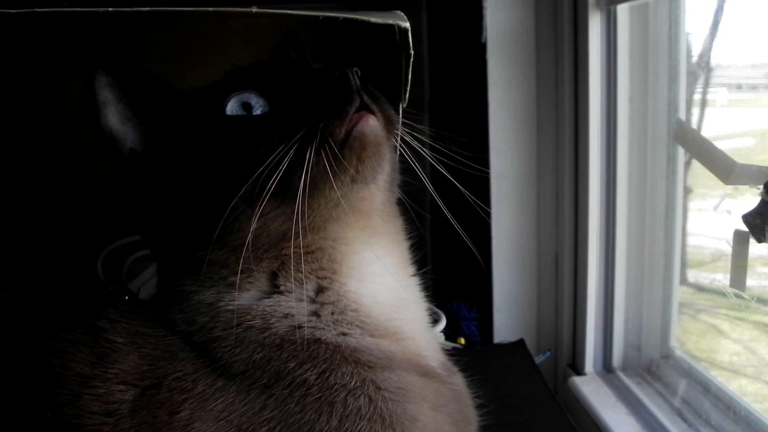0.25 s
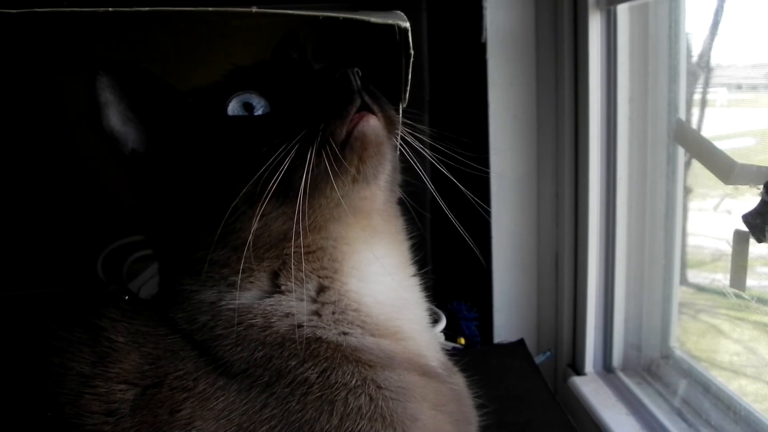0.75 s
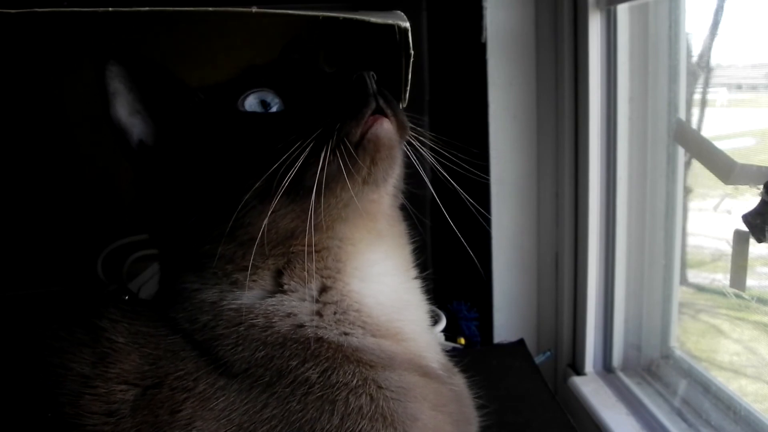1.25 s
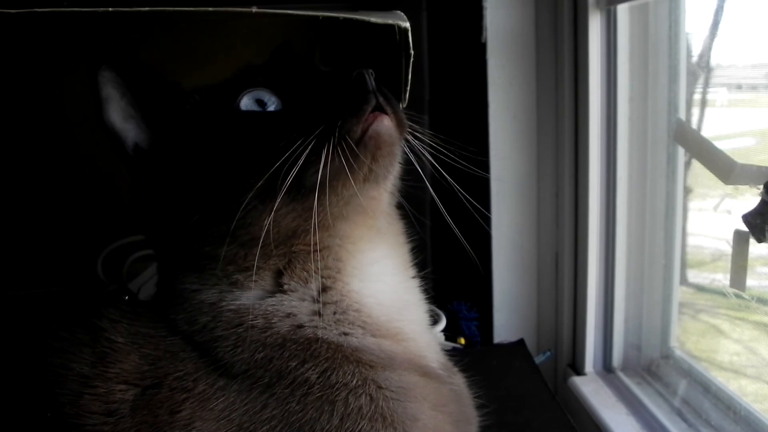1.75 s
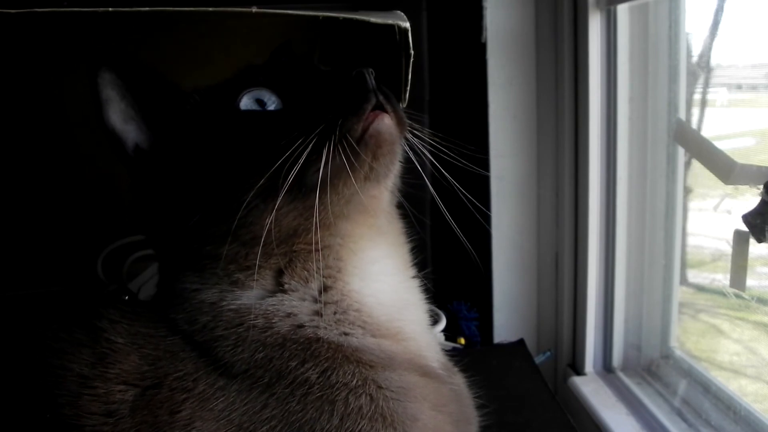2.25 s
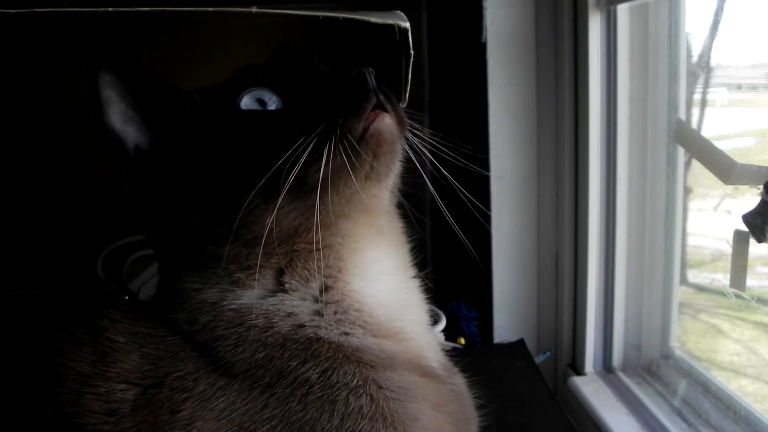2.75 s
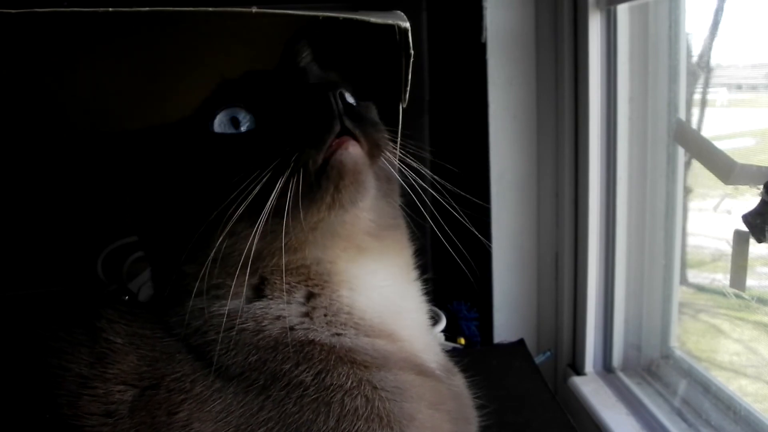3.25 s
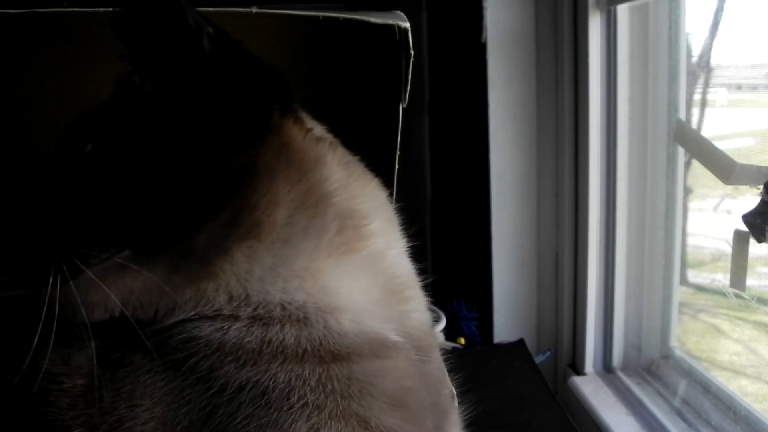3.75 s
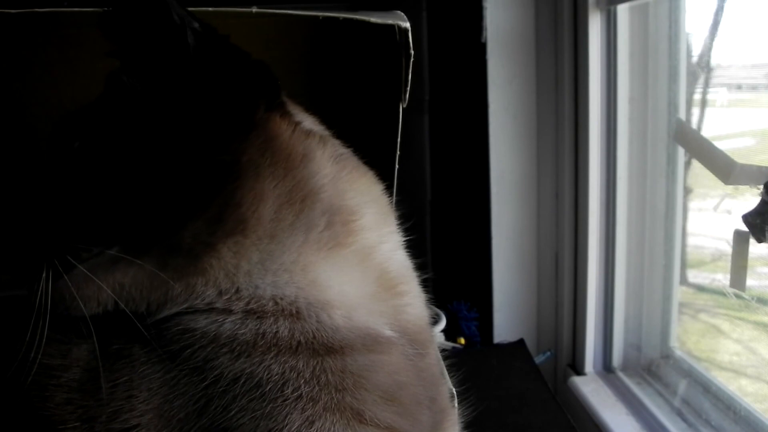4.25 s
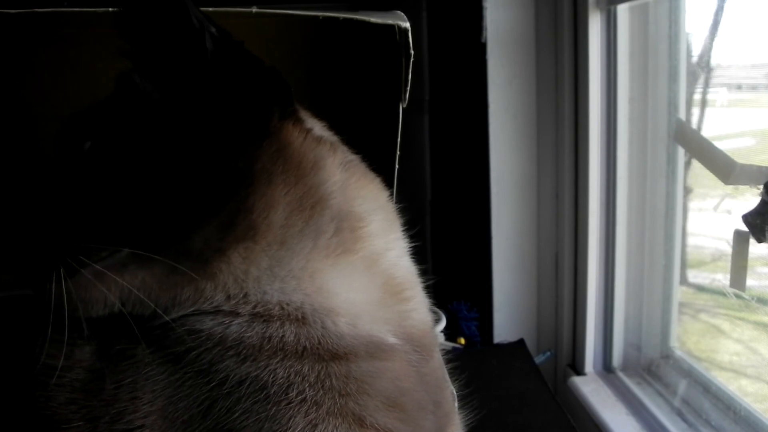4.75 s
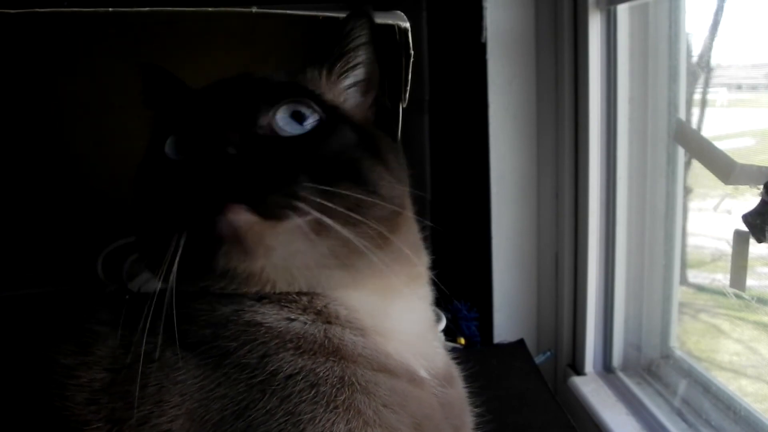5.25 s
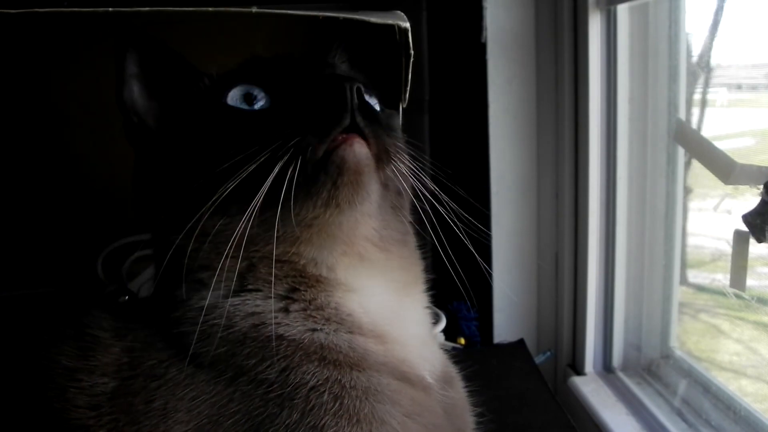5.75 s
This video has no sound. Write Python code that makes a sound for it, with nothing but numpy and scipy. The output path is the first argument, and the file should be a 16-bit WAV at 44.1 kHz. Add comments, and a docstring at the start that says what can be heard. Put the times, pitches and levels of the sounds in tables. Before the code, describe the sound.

A low indoor rumble, a wavering hum and a soft hiss run for the whole six seconds in a small room. From about 0.1 to 1 second, a cat close to the microphone chatters: around nine quick, uneven jaw clicks, dry and voiceless, each a snap with a slight wet crackle and a short room echo. Outside the closed window, distant birds sound faintly, softened by their echo. A falling whistle comes at about 1.1 seconds, small peeps and thin high calls between 1.8 and 3 seconds, and another falling whistle at 3.3. The cat clicks again from about 3.5 to 4.5 seconds, with a tight cluster near 3.7 and another near 4.4. A last faint falling whistle comes at about 5.1 seconds, then only the room tone remains.

```python
"""A cat chatters at birds from behind a closed window: two close bursts of dry, voiceless jaw clicks.
Each click is a snap and a wet crackle that ring the mouth for a few milliseconds; the window recess
and a small room answer it. Outside, birds whistle and peep faintly: gliding tones, heard mostly as
their echo in the yard. Under it all lie a low indoor rumble, a wavering hum and a soft hiss."""
import sys
import numpy as np
from scipy import signal
from scipy.fft import rfft, irfft, next_fast_len
from scipy.io import wavfile
from scipy.ndimage import map_coordinates

SR = 44100
rng = np.random.default_rng(int(sys.argv[2]) if len(sys.argv) > 2 else 0)


def wrap_up_sound(samples):
    """Save the sound to the file named by the first command line argument, as 16-bit audio."""
    columns = np.atleast_2d(samples).T
    # keep every value between -1 and 1, then stretch to whole-number steps
    tamed = np.clip(columns, -1, 1)
    steps = np.round(tamed * 32767).astype(np.int16)
    wavfile.write(sys.argv[1], SR, steps)


N = 265041


# jaw clicks: t/s, relative level/dB, EQ for hollow lows/dB, hard mids/dB, brightness/dB, sharp top/dB,
# then wet crackle over the snap/dB
JAW_CLICKS = [(0.1425, -16, 4, 3, 0, -4, -7.5), (0.2619, -23, 1.5, -3.5, -0.5, -8, -23),
              (0.3927, -22.5, 3, -3.5, 1.5, -5.5, -17), (0.4589, -19.5, 4, 1.5, -0.5, -5, -6.5),
              (.598, -33.5, 5.5, 3, 2, -1, 5), (0.6517, -16, 1.5, -1, 0, -3.5, -10),
              (.752, -19.5, 4.5, 1, -0.5, -1, -4), (0.8242, -18.5, 1.5, 0, 2, -5.5, -11),
              (0.9649, -39, 7.5, 0.5, 5, 3.5, -1), (3.4531, -27, 5, 1, 0, 0.5, -4),
              (3.6452, -26, 6.5, 0.5, 3, 2, -10), (3.7043, -19.5, 4, -2, 1, 0.5, -15),
              (3.771, -16.5, 4, 2, 1, -0.5, -3.5), (3.8299, -17, 3.5, -1.5, -3, -1.5, -12),
              (4.119, -34.5, 5, -4, -4, -2, -1), (4.1277, -27.5, 4, -2, 1.5, -9, -2),
              (4.3723, -31, 3, -1, 0.5, -27, -2), (4.4265, -24.5, 0.5, 0, 5, -1, -2),
              (4.477, -19, 3.5, 3.5, 1.5, 2, -8)]
def chatter(level_db=3.5):
    """Each smack of the jaw rings the mouth; recess and room answer, and each click gets its own EQ."""
    out, t = np.zeros((2, N)), np.arange(SR // 2) / SR
    burst_gain = np.sqrt(2 * len(t) / (.0016 * SR))  # refers the level to a burst of 1.6 ms
    for s, db, low, middle, bright, top, crackle_db in JAW_CLICKS:
        click = close_click(t, crackle_db) + room_answer(t)
        eq = [(1300, low), (1700, 0), (2100, 0), (2500, middle), (2900, middle),
              (4000, bright), (6200, bright), (7400, top)]
        click = filtered(click, lambda hz: causal(amp(along(eq, hz))))
        add(out, amp(db + level_db) * click / burst_gain, s)
    return out


def close_click(t, crackle_db, pitch_spread=.022, strength_spread_db=1.2, sway_ms=.016):
    """One smack through mouth and early echoes; jaw shape and head position vary from click to click."""
    shifts = 1 + pitch_spread * rng.standard_normal(len(MOUTH_FORMANTS))
    strengths_db = strength_spread_db * rng.standard_normal(len(MOUTH_FORMANTS))
    slips_ms = sway_ms * rng.standard_normal(len(ECHO_PATHS))
    response = lambda hz: early_echoes(hz, slips_ms) * mouth(hz, shifts, strengths_db)
    return unit(filtered(smack(t, crackle_db), response))


def smack(t, crackle_db):
    """One snap, then a brief crackle as tongue and lips part; wetter smacks last longer."""
    decay_s = .0013 * amp(crackle_db)
    crackle = rng.standard_normal(len(t)) * t * np.exp(-t / decay_s)
    return signal.unit_impulse(len(t)) + amp(crackle_db) * crackle / np.linalg.norm(crackle)


# resonances of the mouth: f/Hz, width/Hz, relative level/dB
MOUTH_FORMANTS = [(646, 600, 15.5), (1234, 330, 18.5), (2027, 197, 19), (2543, 315, 19), (4400, 2700, 8.5),
                  (5936, 310, 11.5), (7680, 620, 8), (10010, 710, 2.5)]
def mouth(hz, shifts, strengths_db):
    """Steep-sided resonances, shifted and weighted by the shape of the jaw, and one notch."""
    peaks = [amp(db + strength) * ring(hz, f * shift, width) ** 2
             for (f, width, db), shift, strength in zip(MOUTH_FORMANTS, shifts, strengths_db)]
    notch = np.abs(1 - ring(hz, centre_hz=3500, width_hz=300))
    return causal(np.linalg.norm(peaks, axis=0) * notch)


# direct path, window recess and far wall: delay/ms, left level/dB, right level/dB
ECHO_PATHS = [(0, -.5, 2), (.55, -9.5, -4), (.93, -3, 2.5), (1.28, -11, -9), (2.19, -7, -6),
              (2.64, -4.5, -1), (3.66, -12, -6.5), (18.9, -10.5, -8.5), (20, -13, -11)]
def early_echoes(hz, slips_ms):
    """The direct sound and its distinct reflections; the left channel lags in the low mids."""
    echoes = sum(amp([[left], [right]]) * np.exp(-2j * np.pi * hz * (ms + slip) / 1000)
                 for (ms, left, right), slip in zip(ECHO_PATHS, slips_ms))
    left_allpass = 1 - 2 * ring(hz, centre_hz=635, width_hz=1875)
    return echoes * np.array([left_allpass, np.ones_like(hz)])


# reverb time of the small room: f/Hz, T60/s
ROOM_DECAY = [(300, 0.18), (2000, 0.28), (6000, 0.23), (10000, 0.16)]
# colour of a click as the furnishings return it: f/Hz, relative level/dB
ROOM_EQ = [(150, -23), (300, -13), (520, -3), (900, -1), (1300, -3.5), (1600, -3.5), (2100, 0),
           (2500, -0.5), (3200, -2.5), (3600, -13), (4100, -6.5), (6000, -4.5), (7000, -12.5), (7800, -5),
           (8700, -8.5), (10500, -20.5)]
def room_answer(t, scatter_db=-5.5, scatter_t60_s=.17, tail_db=-2):
    """Frame, sill and clutter scatter a short dense burst, and the room adds its tail."""
    def returned(x):
        predelayed = np.pad(x, ((0, 0), (SR // 300, 0)))[:, :len(t)]
        return unit(filtered(predelayed, lambda hz: amp(along(ROOM_EQ, hz))))
    scatter = returned(diffuse(len(t)) * amp(-60 * t / scatter_t60_s))
    tail = returned(reverb_tail(ROOM_DECAY))
    return amp(scatter_db) * scatter + amp(tail_db) * tail


# reverb time of the yard: f/Hz, T60/s
YARD_DECAY = [(2500, .2), (4500, .29), (8000, .09)]
def birds(direct_db=-10):
    """Distant birds, heard through the glass and mostly by way of their echoes."""
    kinds = [(falling_whistle, WHISTLE_CUES), (arch, ARCH_CUES),
             (thin_call, THIN_CUES), (peep, PEEP_CUES)]
    song = sum(call(*cue) for call, cues in kinds for cue in cues)
    echoes = signal.fftconvolve(song[None], reverb_tail(YARD_DECAY), axes=1)[:, :N]
    return amp(direct_db) * song + echoes


# falling whistles: crest t/s, crest f/Hz, lead-in/s, fall/s, opening level/dB, peak level/dB
WHISTLE_CUES = [(1.124, 5350, .02, .124, -57.5, -49.5), (3.286, 4850, .024, .11, -52.5, -48.5),
                (5.148, 5300, .02, .132, -57.5, -49)]
def falling_whistle(crest, crest_hz, lead, fall, opening_db, peak_db, rise_oct_per_s=20, end_hz=2200):
    """The pitch rises to a rounded crest and slides down; the tone swells, then fades at the bottom."""
    since_crest = lambda u: u * (lead + fall) - lead
    fallen = lambda u: np.maximum(since_crest(u), 0) / fall
    rise = lambda u: 2 ** (rise_oct_per_s * np.minimum(since_crest(u), 0))
    hz = lambda u: crest_hz * rise(u) * (end_hz / crest_hz) ** (fallen(u) ** 1.05)
    db = lambda u: np.interp(fallen(u), [0, .72, 1], [opening_db, peak_db, peak_db - 5])
    return bird_tone(crest - lead, lead + fall, hz, db, rasp=.048)


# lower arched notes that join two of the whistles: top t/s, top level/dB
ARCH_CUES = [(1.165, -55.5), (5.196, -53)]
def arch(top, top_db, length_s=.058, top_hz=4070, drop_hz=650, fade_db=7):
    """A brief note whose pitch and level rise and fall together."""
    droop = lambda u: (2 * u - 1) ** 2
    hz = lambda u: top_hz - drop_hz * droop(u)
    db = lambda u: top_db - fade_db * droop(u)
    return bird_tone(top - length_s / 2, length_s, hz, db, rasp=.03)


# thin high calls: t/s, slur level/dB, sweep delay/s, sweep level/dB
THIN_CUES = [(1.853, -61, .105, -68), (2.835, -64.5, .075, -67)]
def thin_call(s, slur_db, sweep_after, sweep_db, slur_s=.035, sweep_s=.125, rasp=.013):
    """A fading downward slur, a short rest, then a growing upward sweep."""
    glide_hz = lambda first, last: lambda u: first * (last / first) ** u
    slur = bird_tone(s, slur_s, glide_hz(8050, 7600), lambda u: slur_db - 2.5 * u, rasp)
    sweep = bird_tone(s + sweep_after, sweep_s, glide_hz(5250, 8600),
                      lambda u: sweep_db - 2 * (1 - u), rasp)
    return slur + sweep


# faint peeps of farther birds: t/s, f/Hz, level/dB
PEEP_CUES = [(1.08, 4550, -58), (1.81, 2750, -64), (1.875, 2880, -60), (2.38, 2600, -61),
             (2.699, 2940, -61), (2.76, 3100, -62)]
def peep(s, hz, db, length_s=.055, sag=.24):
    """A short note that sags in pitch."""
    return bird_tone(s, length_s, lambda u: hz * (1 - sag * (u - .5)), lambda u: db, rasp=.03)


def bird_tone(start, length, hz, db, rasp, flutters_per_s=700, fade_s=.011):
    """A gliding sine that starts raspy and ends clear; hz and db are curves over its progress, 0 to 1."""
    t = np.arange(N) / SR - start
    progress = np.clip(t / length, 0, 1)
    pitch = hz(progress) * (1 + rasp * (1 - progress ** 2) * wobble(flutters_per_s))
    gate = np.clip(np.minimum(t, length - t) / fade_s + 1, 0, 1)
    return gate * amp(db(progress)) * np.sqrt(2) * np.sin(2 * np.pi * np.cumsum(pitch) / SR)


# spectrum of the house rumble: f/Hz, relative level/dB
RUMBLE_SPECTRUM = [(12, -73), (20, -43), (38, -15), (59, -14.5), (81, -6.5), (97, -0.5), (145, 1),
                   (172, -7), (204, -5.5), (231, -9.5), (300, -18), (390, -69), (660, -120)]
# spectrum of the soft hiss: f/Hz, relative level/dB
HISS_SPECTRUM = [(160, -20), (280, -3), (435, 8), (483, 3.5), (645, 5), (797, 0.5), (1050, -2.5), (1280, 1),
                 (1630, -5), (3370, -9), (4850, -14), (7870, -21), (9730, -29), (10500, -50.5),
                 (13600, -72), (22000, -120)]
# indoor hum: f/Hz, level before panning/dB
HUM_TONES = [(101.5, -53.5)]
def room_tone(rumble_db=-46, hiss_db=-41.5, swell_db=1.6, drift_rad=.91):
    """Low rumble of the house, a soft even hiss and a wavering hum a little to the right."""
    rumble = noise_bed(RUMBLE_SPECTRUM) * amp(rumble_db + swell_db * wobble(13))
    hiss = noise_bed(HISS_SPECTRUM) * amp(hiss_db)
    t = np.arange(N) / SR
    hum = sum(amp(db) * np.sqrt(2) * np.sin(2 * np.pi * hz * t + drift_rad * wobble(12))
              for hz, db in HUM_TONES)
    return rumble + hiss + hum * amp([[-1.5], [1.5]])


def noise_bed(spectrum):
    """Diffuse noise of rms 1 whose mid channel has the given spectrum."""
    gain = lambda hz: amp(along(spectrum, hz)) * np.hypot(1, amp(along(STEREO_WIDTH, hz)))
    return unit(filtered(diffuse(N), gain))


def reverb_tail(decay, build_up_s=.002):
    """Reverberation of energy about 1 a channel; each frequency dies at its own speed."""
    n = SR // 2
    hz, t, spectra = signal.stft(diffuse(n), SR, nperseg=256)
    fade = amp(-60 * t / along(decay, hz)[:, None])
    tail = signal.istft(spectra * fade, SR, nperseg=256)[1][:, :n]
    build_up = 1 - np.exp(-np.arange(n) / SR / build_up_s)
    return unit(tail * build_up) / np.sqrt(n)


# width of the diffuse sound: f/Hz, side minus mid/dB
STEREO_WIDTH = [(110, -18), (190, -12), (260, 1), (340, 8), (600, 8.5), (1060, 6.5), (1900, 5.5),
                (3350, 2.5), (6000, .5), (10600, -2)]
# its balance: f/Hz, left minus right/dB
STEREO_BALANCE = [(100, -2), (600, -4), (1900, -1.5), (6000, 0)]
def diffuse(n):
    """White noise from all sides: nearly mono in the bass, very wide in the mids."""
    def mid_side_gains(hz):
        width = amp(along(STEREO_WIDTH, hz))
        return np.array([np.ones_like(hz), width]) / np.hypot(1, width)
    mid, side = filtered(rng.standard_normal((2, n)), mid_side_gains)
    pan = lambda hz: amp(along(STEREO_BALANCE, hz) * np.array([[.5], [-.5]]))
    return unit(filtered(np.array([mid + side, mid - side]), pan))


def ring(hz, centre_hz, width_hz):
    """Response of one resonance."""
    return 1j * hz * width_hz / (centre_hz ** 2 - hz ** 2 + 1j * hz * width_hz)


def causal(gain):
    """The minimum-phase response with this gain: it rings only after the hit."""
    cepstrum = irfft(np.log(gain + 1e-3))
    half = len(cepstrum) // 2
    return np.exp(rfft(cepstrum * np.r_[1, np.full(half - 1, 2), np.zeros(half)]))


def filtered(x, response):
    """Pass x through a complex frequency response."""
    n = x.shape[-1]
    padded = next_fast_len(n + SR // 4)
    return irfft(rfft(x, padded) * response(np.fft.rfftfreq(padded, 1 / SR)), padded)[..., :n]


def wobble(rate):
    """A smooth, looping random curve with rate knots a second."""
    return map_coordinates(rng.standard_normal(200), [np.arange(N) * rate / SR], mode="wrap")


def along(points, hz):
    """Read (f/Hz, value) points on a log frequency axis."""
    freqs, values = np.transpose(points)
    return np.interp(np.log(hz + 1), np.log(freqs + 1), values)


def amp(db):
    """Decibels to gain."""
    return 10 ** (np.asarray(db) / 20)


def unit(x):
    """Scale to rms 1."""
    return x / np.sqrt(np.mean(x ** 2) + 1e-20)


def add(track, sound, s):
    """Mix a sound into a track at time s."""
    part = track[:, round(s * SR):][:, :sound.shape[-1]]
    part += sound[:, :part.shape[-1]]


def scene():
    """The cat up close, the birds far off, room tone underneath."""
    return chatter() + birds() + room_tone()


def record(dry):
    """The camera's band limit: a brick-wall high cut."""
    cutoff_hz = 10900
    return filtered(dry, lambda hz: 1 / np.sqrt(1 + (hz / cutoff_hz) ** 130))


dry = scene()
out = record(dry)
wrap_up_sound(out)
```